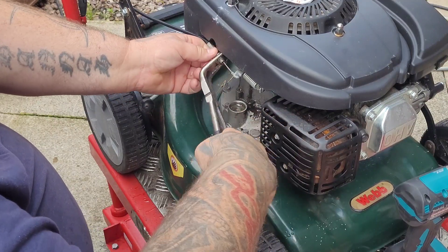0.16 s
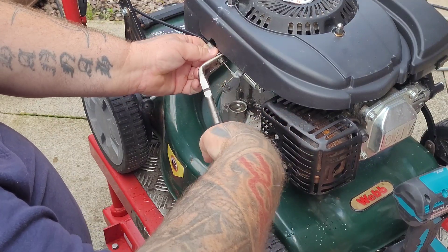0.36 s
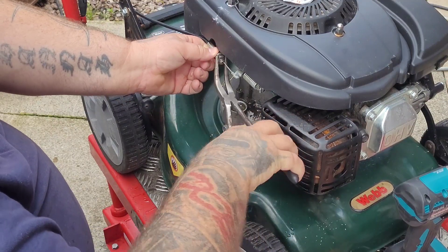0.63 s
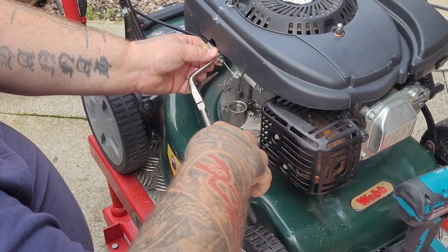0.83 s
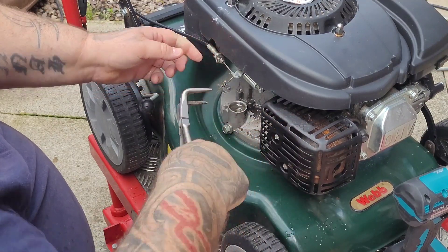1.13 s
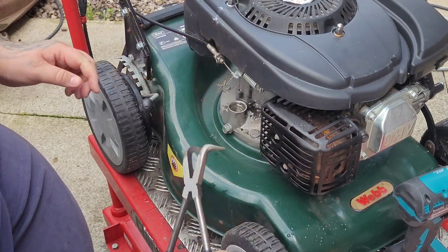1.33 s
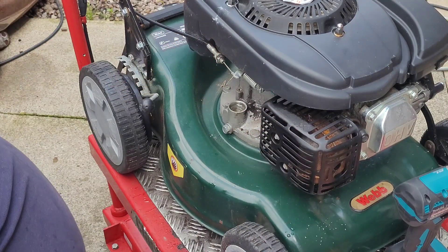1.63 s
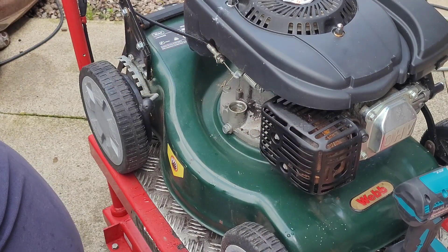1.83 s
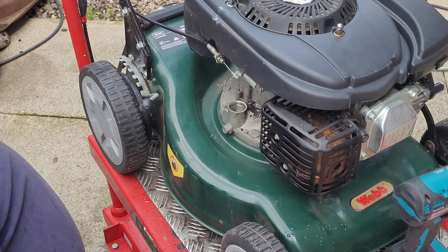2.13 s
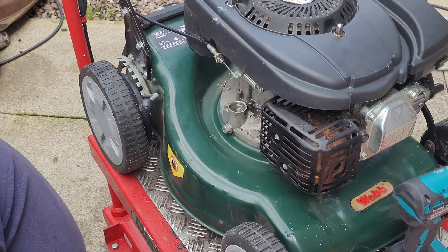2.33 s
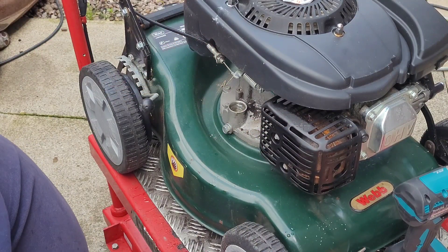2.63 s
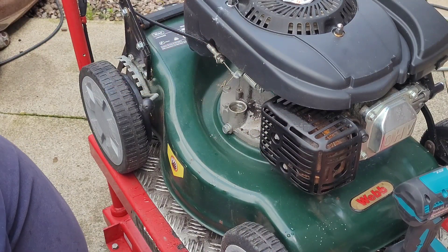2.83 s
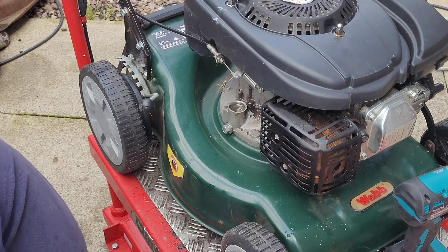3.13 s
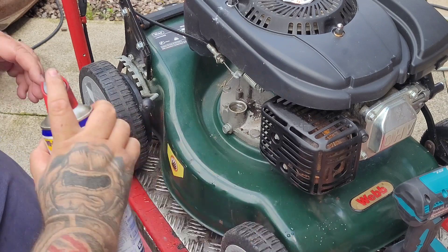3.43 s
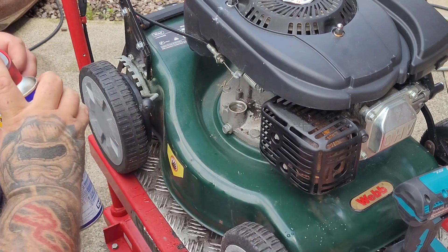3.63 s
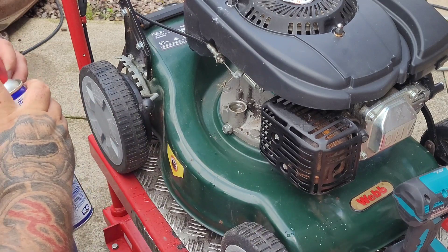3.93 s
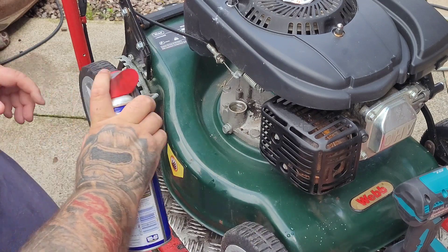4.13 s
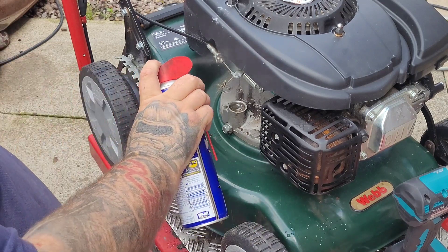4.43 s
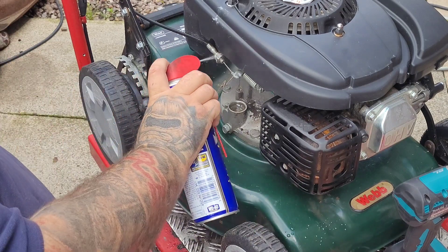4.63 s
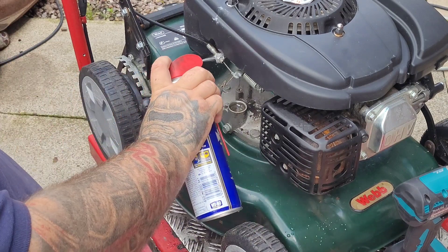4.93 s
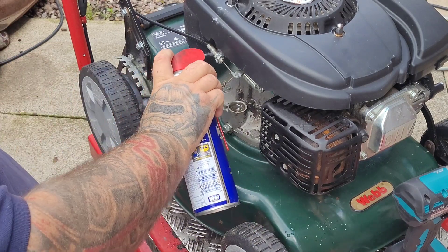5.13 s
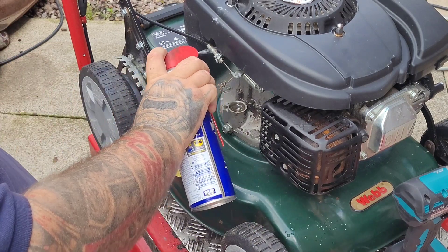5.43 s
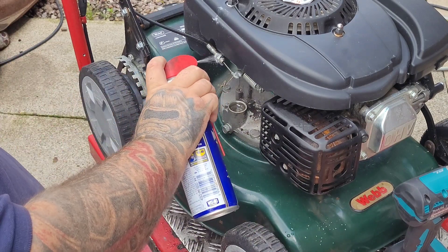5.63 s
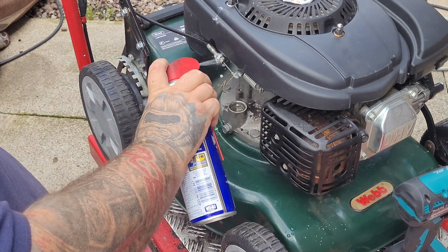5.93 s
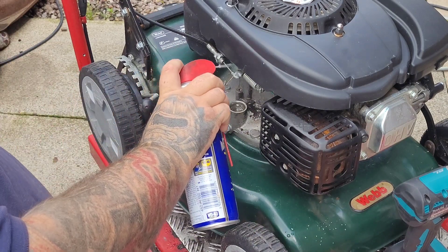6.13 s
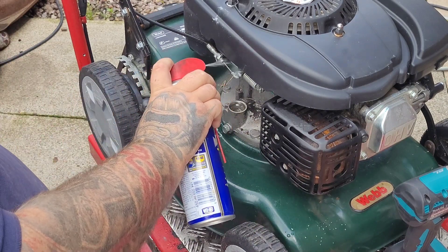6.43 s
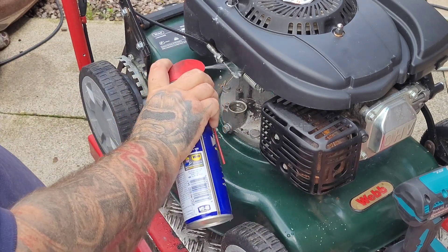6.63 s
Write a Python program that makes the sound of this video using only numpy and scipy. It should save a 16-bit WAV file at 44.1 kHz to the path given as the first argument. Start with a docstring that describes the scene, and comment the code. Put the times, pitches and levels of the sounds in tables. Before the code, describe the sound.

Close to a phone microphone outdoors, small clicks of pliers give way to several sharp knocks that set a steel table and loose tools ringing. After some quiet handling of a spray can, a quick spurt is followed at once by a steady, high hiss with a fine splash of droplets, lasting to the end. A faint low hum and light puffs of air lie underneath.

```python
"""An aerosol can sprays a cable, one short burst, then a long hiss: gas jets from the straw, droplets
splash, the blast drums on the engine cover of a lawn mower standing on a steel lift table.
Before that, pliers nip at the cable and are put down with a clatter that rings table and tools;
the can is picked up and its straw flipped out. Outdoors: a low hum and light puffs of air lie
underneath. Heard at the two microphone ports of a phone close by."""
import sys
import numpy as np
from scipy import signal
from scipy.fft import rfft, irfft
from scipy.io import wavfile
from scipy.ndimage import uniform_filter1d

SR = 44100
rng = np.random.default_rng(int(sys.argv[2]) if len(sys.argv) > 2 else 0)


def dump(signal):
    """Clip the signal to [-1, 1] and save it as 16-bit WAV at the path in sys.argv[1]."""
    limited = np.clip(np.atleast_2d(signal).T, -1, 1)
    pcm = np.round(limited * 32767).astype(np.int16)
    wavfile.write(sys.argv[1], SR, pcm)


N = 298557
TIME_S = np.arange(N) / SR
PORT_LAG_S = 0.00016

# Valve presses. Each row: start, end and opening time in seconds, extra jet, splash and cover gain in dB.
PRESSES = [(4.341, 4.527, .03, 4.5, 11.5, 9.5), (4.584, 6.8, .013, 0.5, 0.5, -0.5)]
# Finger and aim shift. Each row: time in seconds, relative jet, splash and cover level in dB.
SPRAY_LEVELS = [(4.62, -50.5, -65, -81), (4.77, -48, -67, -79), (4.91, -50, -69.5, -86),
                (5.05, -48.5, -63, -83.5), (5.17, -44.5, -60.5, -69), (5.27, -48.5, -63, -82),
                (5.59, -46, -62, -79), (5.64, -48.5, -65, -86), (5.75, -49, -63.5, -79.5),
                (6.07, -44.5, -57, -69), (6.26, -45.5, -64.5, -77.5), (6.33, -46.5, -60, -77),
                (6.6, -47.5, -68, -85.5), (6.65, -48.5, -61, -84), (6.76, -47.5, -60.5, -73.5)]
# Jet catching the cable end. Each row: time in seconds, relative level in dB.
WHISTLE_LEVELS = [(6.6, -89.5), (6.635, -70.5), (6.67, -51.5), (6.7, -59.5), (6.77, -69)]
# Spray spectra. Each row: frequency in Hz, relative level in dB.
JET_SPECTRUM = [(5000, -50), (8500, -19), (9700, -11), (11000, -7), (13000, -5), (14500, -1), (15700, -2.5)]
SPLASH_SPECTRUM = [(1800, -21), (2600, -14.5), (3300, -4.5), (4000, -2), (4800, 2.5), (6300, 1), (7800, 3),
                   (8600, -5.5), (12000, -4.5), (16000, -8.5)]
COVER_SPECTRUM = [(200, 7), (450, -3.5), (750, -11.5), (1150, -6), (1700, 4.5), (2150, 1), (2600, -12.5),
                  (3200, -5.5), (4500, -11.5)]
WHISTLE_SPECTRUM = [(2800, -48), (3500, -13), (4200, -18), (4700, 2), (5100, -5), (5400, -1), (5900, -19),
                    (9000, -33)]

# Blows of pliers and can. Each row: start in seconds, relative level in dB, tilt in dB per octave,
# contact time in seconds, favoured table pitch in Hz, relative table boom in dB.
KNOCKS = [(0.104, -79, -2, .004, 680, -62.5), (0.163, -77, -7, 0.0029, 670, -59.5),
          (0.5605, -49.5, -0.66, 0.00051, 505, -44), (0.731, -76.5, 0, 0.0048, 600, -62.5),
          (0.757, -70, -3.5, .003, 600, -65), (0.7785, -71.5, 1.5, .0005, 600, -80),
          (0.8041, -53.5, -5, 0.00089, 308, -42), (0.8145, -49, -3, .0003, 430, -41),
          (2.2434, -24, 0.8, .002, 335, -30), (2.266, -32.5, -0.9, .001, 366.8, -24.5),
          (2.476, -36, 0, .003, 327, -29.5), (2.75, -25.5, -1.06, .0018, 608, -22.5),
          (2.8576, -26.5, -0.37, .0004, 302.4, -34.5), (2.8764, -25, -0.5, .001, 262, -12.8),
          (3.261, -78.5, -7, 0.0057, 252, -63.5)]
# Band edges of a blow in Hz.
BAND_EDGES_HZ = [130, 400, 900, 2400, 6500, 16000]
BAND_CENTRES_HZ = np.sqrt(np.multiply(BAND_EDGES_HZ[:-1], BAND_EDGES_HZ[1:]))
# Spectrum shared by all blows. Each row: frequency in Hz, relative level in dB.
BLOW_SPECTRUM = [(230, -2.5), (600, -1.5), (1500, 1), (4000, 2), (10000, -2)]
# Decay of loose steel. Each row: frequency in Hz, T60 in seconds.
CLATTER_DECAY = [(150, .15), (400, 0.21), (1500, .135), (5000, 0.15), (15000, 0.14)]
# Modes of table top and tools. Each row: frequency in Hz, relative level in dB, T60 in seconds.
TABLE_MODES = [(150, -9.5, 0.072), (207.4, 1.5, 0.094), (225, -6.5, 0.2), (256.5, 3.5, 0.21),
               (292.6, -4, .28), (342.6, -11, .18), (391, -7.5, 0.29), (492, -2.5, 0.18), (596, -4, .22),
               (647, -2.5, 0.12)]
TOOL_MODES = [(856, -9, .16), (958, -4, .18), (1141, -5, .18), (1268, -1, .16), (1417, 0, .17),
              (1674, -3, .13), (1777, 0, .15), (1884, -4, .17), (2105, -5, .14), (2401, -4, .15),
              (2600, -6, .14), (2852, -4, .15), (3131, -3, .12), (3705, -4, .11), (3956, -3, .11),
              (4174, -3, .1), (4690, -5, .1), (5550, -5, .11), (6100, -6, .08)]

# Ticks of cable, cap and straw. Each row: start in seconds, level in dB, pitch in Hz.
TICKS = [(.78, -66, 2700), (3.294, -67.5, 1450), (3.357, -63, 6820), (3.443, -66, 8900),
         (3.551, -67.5, 3060), (3.585, -64, 3520), (3.787, -67, 7700), (4.246, -73, 2000)]
# Steel on steel, sleeve, hand on can, air puffs.
# Each row: peak time in seconds, level in dB, half-width in seconds.
SLIDES = [(.125, -69.5, 0.027), (.775, -71, .03), (2.44, -58, 0.076), (2.62, -59, 0.085),
          (2.738, -49, .033)]
RUSTLES = [(4.64, -69.5, 0.069), (4.765, -65, 0.049), (5.735, -66, .035)]
GRIPS = [(3.35, -73, 0.051), (3.59, -72.5, 0.043), (3.68, -76, 0.094), (3.95, -77.5, 0.077),
         (4.02, -69.5, 0.053)]
PUFFS = [(1.412, -53.5, 0.032), (2.585, -50.5, 0.026), (5.786, -53.5, 0.037), (5.96, -49.5, 0.02),
         (6.222, -57.5, 0.038)]
# Friction and background spectra. Each row: frequency in Hz, relative level in dB.
SLIDE_SPECTRUM = [(120, -40.5), (200, -13.5), (278, -1), (836, -16.5), (1060, -17), (2510, -28),
                  (6050, -31), (8420, -33), (13100, -25), (16000, -35)]
RUSTLE_SPECTRUM = [(120, -20), (250, 0.5), (450, 1), (700, -8), (1200, -13.5), (3000, -28), (10000, -50)]
GRIP_SPECTRUM = [(590, -44), (1000, -10.5), (1830, -3), (2560, -15), (3340, -7), (3930, -9.5), (7270, -6),
                 (16000, -10)]
MURMUR_SPECTRUM = [(15, -23), (30, -7.5), (48, -1.5), (75, -5), (130, -5.5), (190, -12.5), (255, -5),
                   (400, -13), (600, -19.5), (900, -23.5), (1500, -27), (2500, -35.5), (6000, -46),
                   (16000, -46.5)]
HISS_SPECTRUM = [(1000, -4), (6000, -3), (8800, -2), (9800, 1), (11000, -4.5), (16000, -6)]
WIND_SPECTRUM = [(15, -15), (35, -3.5), (60, 1.5), (100, -17), (200, -26), (1000, -68.5), (8000, -100)]
# Background in two blocks, before and after the clatter.
# Each row: time in seconds, relative hum and murmur level in dB.
BACKGROUND_LEVELS = [
    [(0.0, -68, -78), (0.42, -72, -75.5), (0.59, -65.5, -71.5), (0.76, -68.5, -71.5), (1.09, -71, -78.5),
     (2.15, -71.5, -76)],
    [(3.5, -75, -80.5), (4.28, -71, -77.5), (4.62, -65.5, -69.5), (5.25, -68, -78), (6.16, -62.5, -71.5),
     (6.76, -68, -72.5)],
]
# Likeness of the two ports. Each row: frequency in Hz, coherence from 0 to 1.
PORT_COHERENCE = [(100, 0.91), (280, 0.89), (800, 0.2), (1800, 0.3), (4000, 0.3), (15000, .05)]
MURMUR_COHERENCE = [(30, .5), (120, .81), (400, .95), (1500, .36)]


def spray(jet_db=4.5, splash_db=4.0, cover_db=6.5):
    """Gas hisses from the straw, droplets splash on the cable, the blast drums on the cover."""
    jet = shimmer(noise(JET_SPECTRUM, coherence=.97, lag_s=.00001), depth_db=2.1)
    splash = shimmer(noise(SPLASH_SPECTRUM, coherence=.4, lag_s=.00003, right_db=4), depth_db=2.6)
    cover = shimmer(noise(COVER_SPECTRUM, coherence=.32, right_db=1), depth_db=3)
    # liquid leaves the straw unevenly
    jet *= undb(curve(SPRAY_LEVELS, column=1) + jet_db + .6 * walk(180))
    splash *= undb(curve(SPRAY_LEVELS, column=2) + splash_db + .83 * walk(400))
    cover *= undb(curve(SPRAY_LEVELS, column=3) + cover_db)
    out = np.zeros((2, N))
    for start_s, end_s, open_s, extra_jet_db, extra_splash_db, extra_cover_db in PRESSES:
        flow = valve(start_s, end_s, open_s)
        # the bright jet dies first, the lower sounds linger
        out += flow * undb(extra_jet_db) * jet
        out += flow ** .71 * undb(extra_splash_db) * splash
        out += np.sqrt(flow) * undb(extra_cover_db) * cover
    return out


def valve(start_s, end_s, open_s, close_s=.017):
    """Flow of one press: opens, holds, dies away as the straw empties."""
    opening = np.clip((TIME_S - start_s) / open_s, 0, 1)
    return opening * np.exp(-np.maximum(TIME_S - end_s, 0) / close_s)


def cable_whistle(gain_db=-1.5):
    """The jet catches the cable end and whistles hoarsely."""
    whistle = noise(WHISTLE_SPECTRUM, coherence=.3, right_db=3)
    level_db = curve(WHISTLE_LEVELS) + gain_db + 1.4 * walk(100)
    return whistle * undb(level_db) * (TIME_S > WHISTLE_LEVELS[0][0])


def knocks(boom_db=-1, tools_db=-2, clatter_db=-2):
    """Pliers and can hit mower and table; harder surfaces tilt the blow to the treble."""
    out, t = np.zeros((2, N)), np.arange(SR // 2) / SR
    octaves = np.log2(BAND_CENTRES_HZ / np.median(BAND_CENTRES_HZ))
    for start_s, level_db, tilt_db_oct, contact_s, favoured_hz, table_db in KNOCKS:
        bands_db = level_db + tilt_db_oct * octaves + at_hz(BLOW_SPECTRUM, BAND_CENTRES_HZ)
        boom = undb(table_db + boom_db) * table_ring(t, favoured_hz)
        clink = undb(tools_db) * tool_ring(t, bands_db)
        add(out, start_s, boom + clink + undb(clatter_db) * clatter(t, bands_db, contact_s))
    # a small sheet radiates little deep bass
    return signal.sosfilt(signal.butter(2, 50, "high", fs=SR, output="sos"), out)


def clatter(t, bands_db, contact_s, crack_s=.0041, build_cycles=1.2, echo_db=-23, echo_t60_s=.39):
    """Crowded modes of loose steel: a crack, a chattering ring with late lows, a faint yard echo."""
    density_db = bands_db - 10 * np.log10(np.diff(BAND_EDGES_HZ))
    bass = [(hz, density_db[0] + db) for hz, db in [(30, -31), (70, -13), (115, -7.5), (150, -3)]]
    top_db = density_db[-1] + np.clip(.48 * (bands_db[-1] + 25), -12, 1)  # harder blows are brighter
    spectrum = [*bass, *zip(BAND_CENTRES_HZ, density_db), (15000, top_db)]
    ring = noise(spectrum, lag_s=PORT_LAG_S, right_db=1.5, size=len(t))
    chatter = undb(4 * walk(330)[:len(t)])
    crack = 1 + .5 * np.exp(-t / crack_s)
    echo = undb(echo_db) * fade(t, echo_t60_s)
    edges_hz = [0, *BAND_EDGES_HZ[1:]]
    out = 0
    for low_hz, high_hz, hz, level_db in zip(edges_hz, edges_hz[1:], BAND_CENTRES_HZ, bands_db):
        attack = 1 - np.exp(-t / (contact_s + build_cycles / hz))
        decay = fade(t, at_hz(CLATTER_DECAY, hz)) * crack
        if hz > 900:
            decay *= chatter
        part = band(ring, low_hz, high_hz) * attack * (decay + echo)
        out += undb(level_db) * part / part[:, t < .03].std()
    return out


def table_ring(t, favoured_hz, width_oct=.42):
    """The table top booms; the place of the blow favours modes near one pitch."""
    offset_oct = np.log2(np.array(TABLE_MODES)[:, 0] / favoured_hz)
    gains = .13 + np.exp(-(offset_oct / width_oct) ** 2)
    out = modes(t, TABLE_MODES, gains, rise_cycles=1.2)
    out *= 1 + 2.4 * np.exp(-t / .0088)  # the tool settles and damps the first swings
    return out / out[:, t < .03].std()


def tool_ring(t, bands_db, left_db=-5):
    """Steel tools lying to the right ring as strongly as the blow excites their range."""
    blow = list(zip(BAND_CENTRES_HZ, bands_db))
    gains = undb(at_hz(blow, np.array(TOOL_MODES)[:, 0]))
    return modes(t, TOOL_MODES, gains, rise_cycles=.72) * undb([[left_db], [0]])


def ticks(rattle_count=6, rattle_span_s=(3.0, 3.28), rattle_db=-76, rattle_hz=1820, spread_oct=.4):
    """Light contacts of cable, cap and straw; fainter rattles as the straw is flipped out."""
    out = np.zeros((2, N))
    for start_s, level_db, hz in TICKS:
        add(out, start_s, undb(level_db) * tick(hz))
    for _ in range(rattle_count):
        hz = rattle_hz * 2 ** rng.uniform(-spread_oct, spread_oct)
        add(out, rng.uniform(*rattle_span_s), undb(rattle_db) * tick(hz))
    return out


def tick(hz, t60_s=.17, rise_s=.0009):
    """One contact rings briefly around one pitch."""
    t = np.arange(SR // 4) / SR
    spectrum = [(hz / 4, -22), (hz * .82, -8), (hz, 0), (hz * 1.02, -10), (hz * 4, -20)]
    ring = noise(spectrum, right_db=1.5, size=len(t))
    return ring * fade(t, t60_s) * (1 - np.exp(-t / rise_s))


def friction():
    """A tool slides on steel, a sleeve rustles, fingers shift on the can."""
    slide = noise(SLIDE_SPECTRUM, right_db=-.5) * swells(SLIDES) * undb(1.3 * walk(120))
    sleeve = noise(RUSTLE_SPECTRUM) * swells(RUSTLES) * undb(2.2 * walk(60))
    grip = shimmer(noise(GRIP_SPECTRUM), depth_db=4) * swells(GRIPS) * undb(2.4 * walk(70))
    return slide + sleeve + grip


def wind(eddy_start_s=4.6, eddy_db=-66):
    """Air puffs on the microphone; light eddies fade in during the long spray."""
    eddies = np.clip(TIME_S - eddy_start_s, 0, 1) * undb(eddy_db + 3 * walk(14))
    return noise(WIND_SPECTRUM, coherence=.24) * (swells(PUFFS) + eddies)


def background(hum_hz=99.7, hum_db=.5, murmur_db=4.5, hiss_db=-83.5):
    """A wavering hum, the murmur of far surroundings, faint hiss."""
    levels = np.vstack(BACKGROUND_LEVELS)
    phase = 2 * np.pi * np.cumsum(hum_hz + 1.1 * walk(9)) / SR
    hum = np.sqrt(2) * np.sin(phase) * undb(curve(levels, column=1) + hum_db + .9 * walk(8))
    murmur = noise(MURMUR_SPECTRUM, coherence=MURMUR_COHERENCE, right_db=-3.5)
    murmur *= undb(curve(levels, column=2) + murmur_db + .64 * walk(3.5))
    hiss = noise(HISS_SPECTRUM, coherence=.41) * undb(hiss_db)
    return hum + murmur + hiss


def shimmer(x, depth_db, width_hz=260, hold_s=.091, size=1024):
    """Reflections off engine and deck interfere: narrow peaks and dips shift as the hand sways."""
    spectrum = signal.stft(x, nperseg=size)[2]
    ripple = rng.standard_normal(spectrum.shape[1:])
    for _ in range(2):
        ripple = uniform_filter1d(ripple, round(width_hz * size / SR), axis=0)
        ripple = uniform_filter1d(ripple, round(2 * hold_s * SR / size), axis=1)
    spectrum *= undb(depth_db * unit(ripple))
    return unit(signal.istft(spectrum, nperseg=size)[1][:, :N])


def modes(t, table, gains, rise_cycles, scatter_db=1.5):
    """Decaying modes of one blow; higher modes differ more in phase between the ports."""
    out = 0
    for (hz, level_db, t60_s), gain in zip(table, gains):
        phase = rng.uniform(0, 2 * np.pi)
        left_shift = -2 * np.pi * hz * PORT_LAG_S + rng.normal() * hz / 2500
        swing = np.sin(2 * np.pi * hz * t + phase + np.array([[left_shift], [0]]))
        envelope = (1 - np.exp(-t * hz / rise_cycles)) * fade(t, t60_s)
        out += gain * undb(level_db + scatter_db * rng.normal()) * swing * envelope
    return out


def noise(spectrum, coherence=PORT_COHERENCE, lag_s=0, right_db=0, size=N):
    """Coloured noise at two ports; the left lags, and right_db pans it where coherence is low."""
    hz = np.fft.rfftfreq(size, 1 / SR)
    mid, side = rfft(rng.standard_normal((2, size))) * undb(at_hz(spectrum, hz))
    alike = at_hz(coherence, hz) if np.ndim(coherence) else coherence
    mid, side = mid * np.sqrt(1 + alike), side * np.sqrt(1 - alike)
    left = (mid + side) * np.exp(-2j * np.pi * hz * lag_s) * undb(-right_db * (1 - alike))
    return unit(irfft([left, mid - side], size))


def walk(rate_hz):
    """Random steps, smoothed twice; rms near 1."""
    hold = int(SR / rate_hz)
    steps = np.repeat(rng.standard_normal(N // hold + 1), hold)
    return 1.3 * uniform_filter1d(uniform_filter1d(steps, hold), hold)[:N]


def swells(table):
    """Sum of bell-shaped envelopes."""
    return sum(undb(db) * np.exp(-((TIME_S - peak_s) / width_s) ** 2) for peak_s, db, width_s in table)


def curve(rows, column=1):
    """Interpolate a column over time."""
    rows = np.array(rows)
    return np.interp(TIME_S, rows[:, 0], rows[:, column])


def at_hz(points, hz):
    """Interpolate over log frequency."""
    points_hz, values = np.transpose(points)
    return np.interp(np.log(np.maximum(hz, 1)), np.log(points_hz), values)


def band(x, low_hz, high_hz):
    """Brick-wall band-pass."""
    hz = np.fft.rfftfreq(x.shape[-1], 1 / SR)
    return irfft(rfft(x) * ((hz >= low_hz) & (hz < high_hz)), x.shape[-1])


def fade(t, t60_s):
    """Exponential decay."""
    return np.exp(-np.log(1000) * t / t60_s)


def undb(db):
    """Decibels to gain."""
    return 10 ** (np.asarray(db) / 20)


def unit(x):
    """Scale to rms 1."""
    return x / np.sqrt(np.mean(x ** 2) + 1e-30)


def add(out, start_s, x):
    """Mix x in at start_s."""
    i = int(start_s * SR)
    out[:, i:i + x.shape[1]] += x[:, :N - i]


def scene():
    """All sources at the two ports."""
    return knocks() + friction() + ticks() + spray() + cable_whistle() + wind() + background()


def record(dry):
    """The phone's steep low-pass."""
    cutoff_hz = 15900
    return signal.sosfilt(signal.ellip(10, .2, 70, cutoff_hz, fs=SR, output="sos"), dry)


dry = scene()
out = record(dry)
dump(out)
```